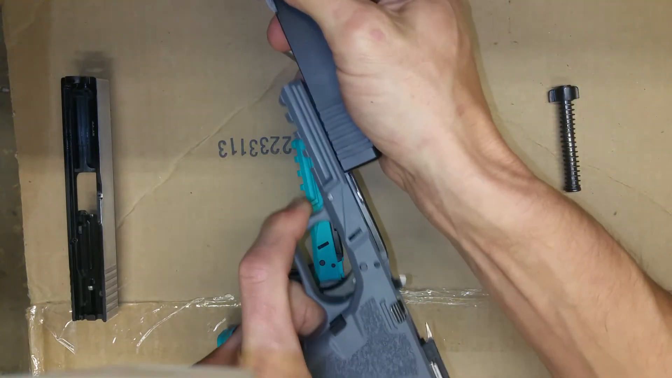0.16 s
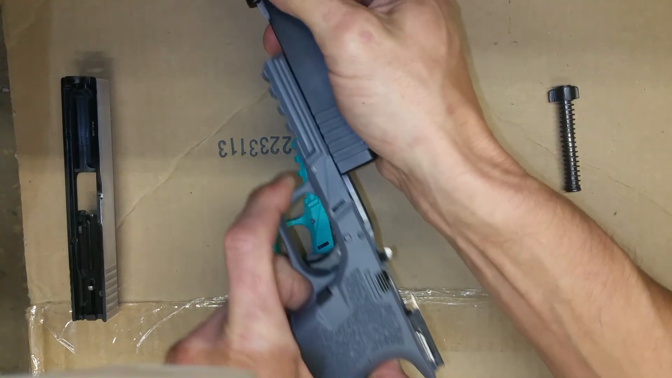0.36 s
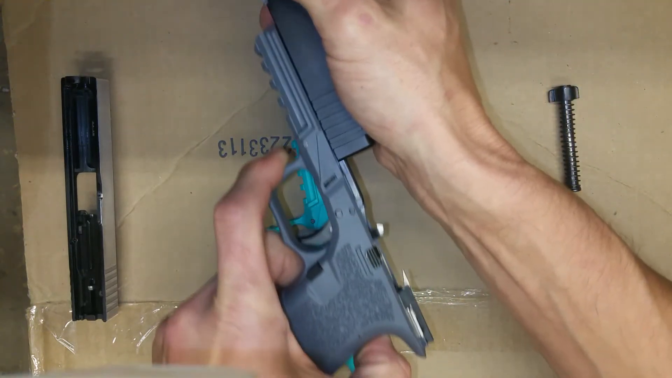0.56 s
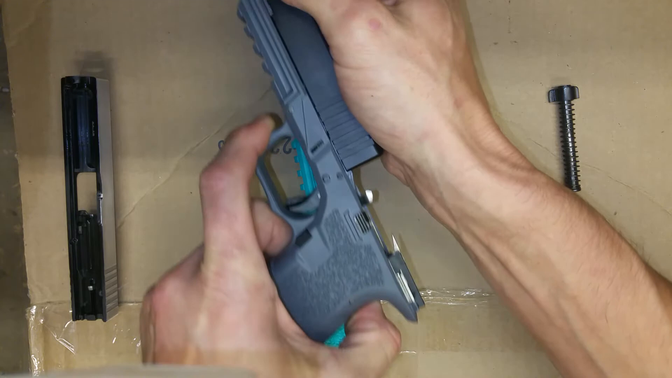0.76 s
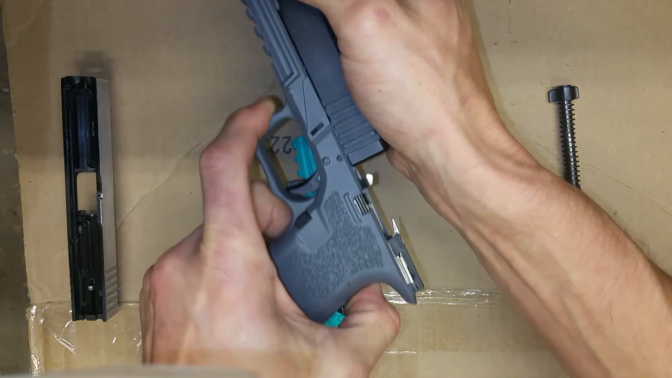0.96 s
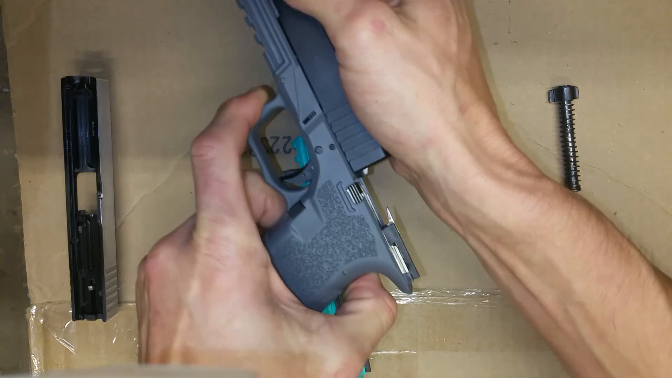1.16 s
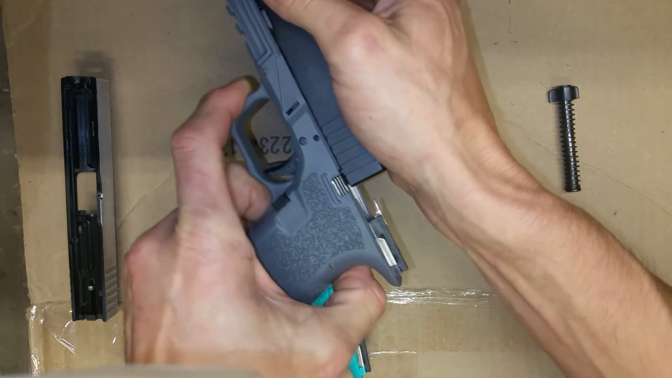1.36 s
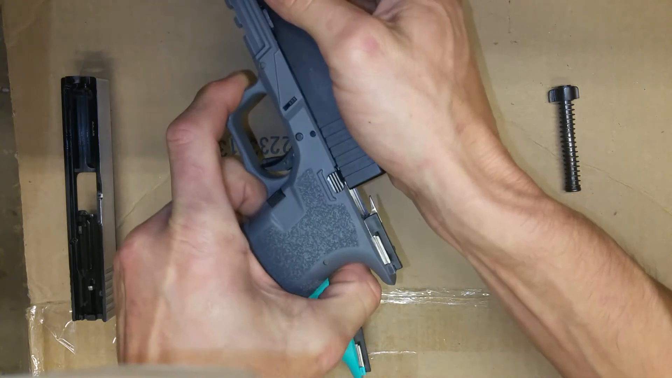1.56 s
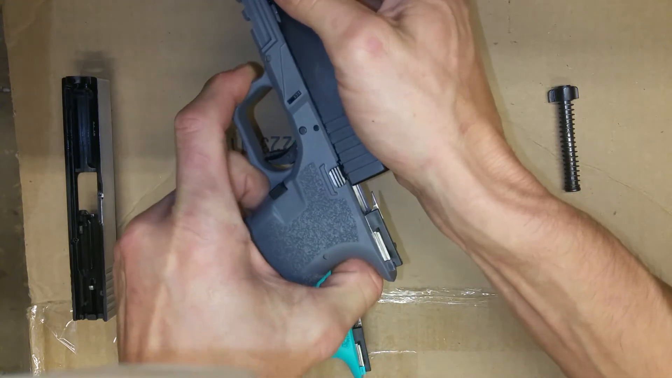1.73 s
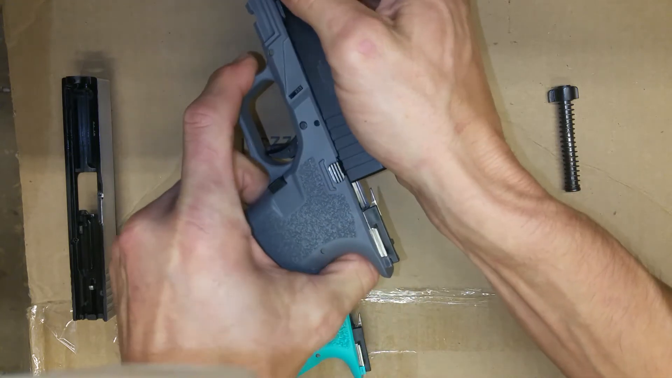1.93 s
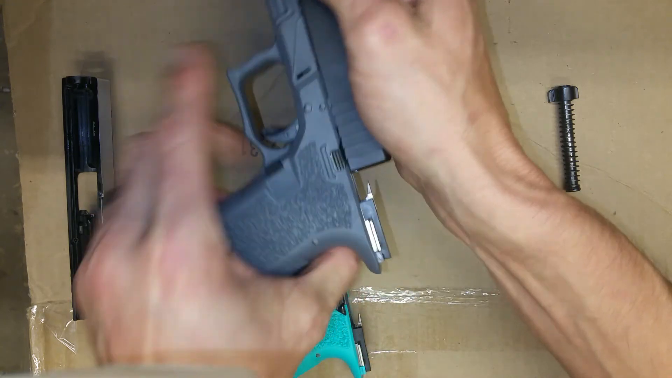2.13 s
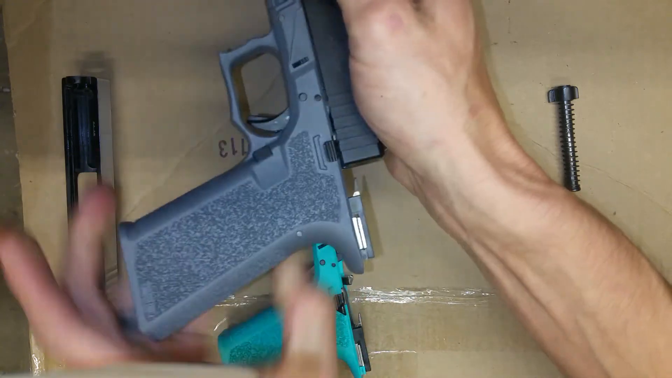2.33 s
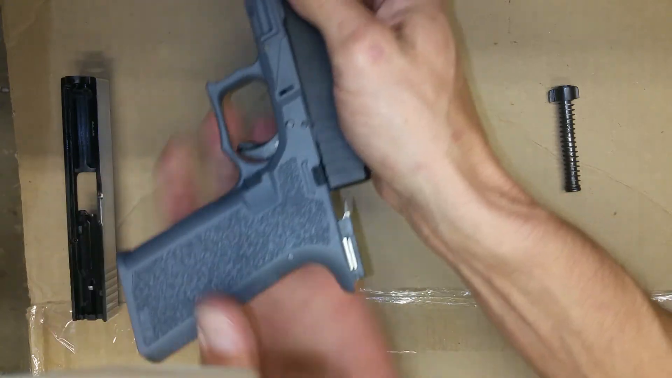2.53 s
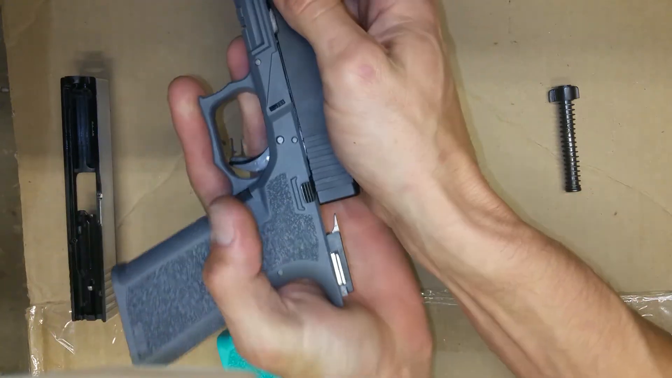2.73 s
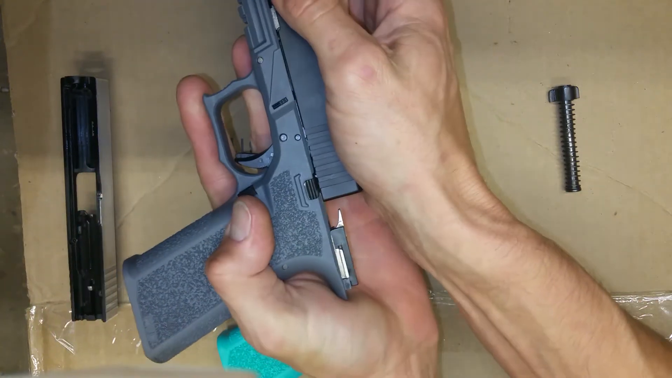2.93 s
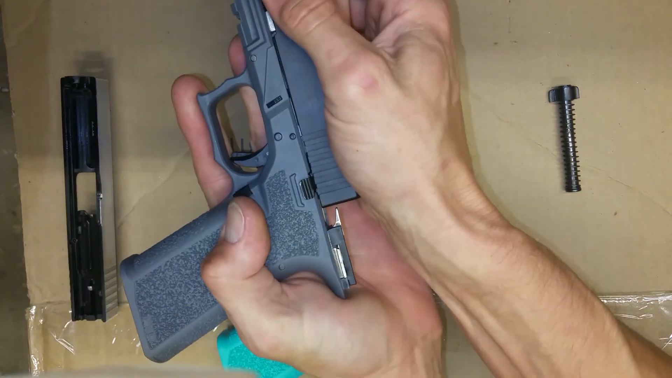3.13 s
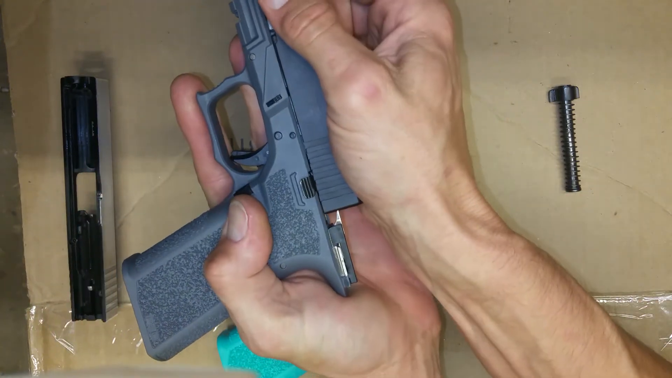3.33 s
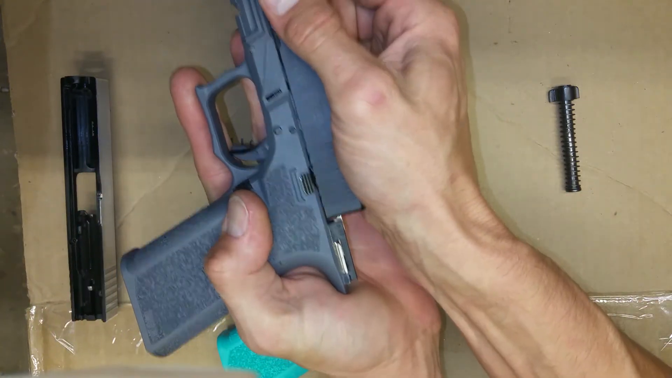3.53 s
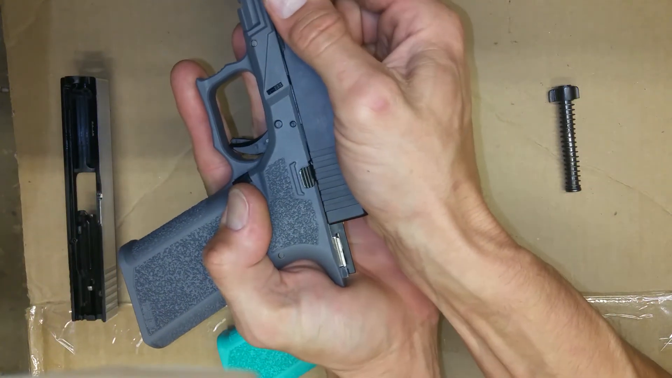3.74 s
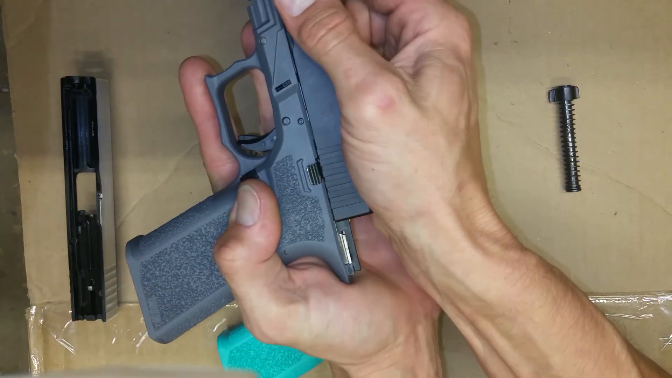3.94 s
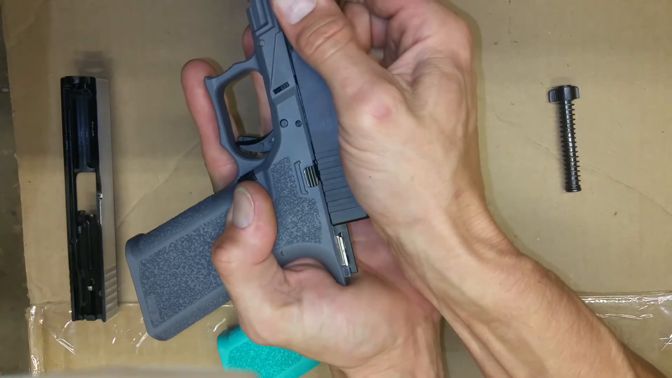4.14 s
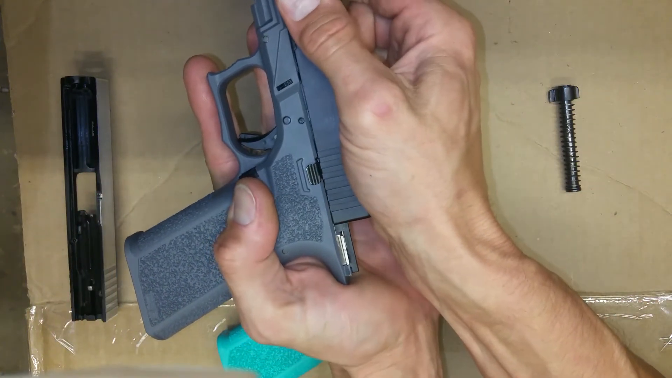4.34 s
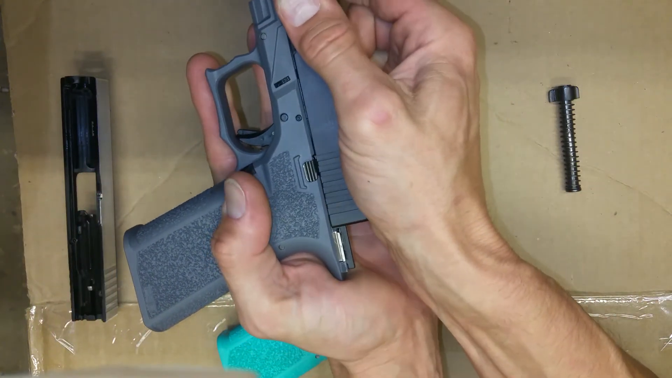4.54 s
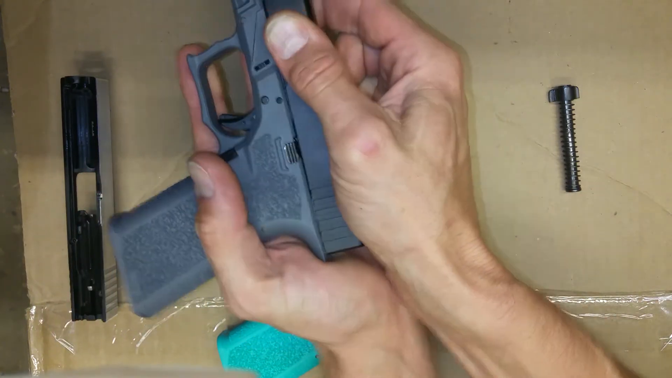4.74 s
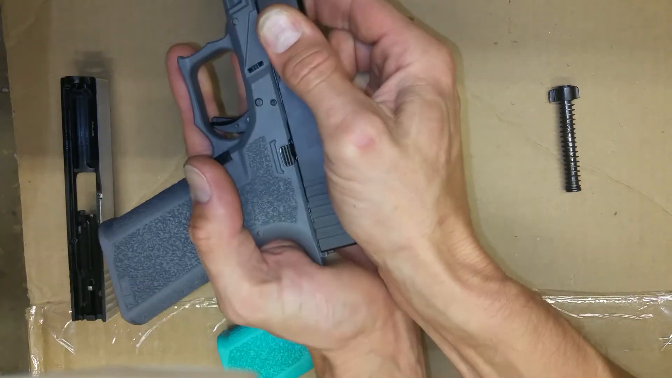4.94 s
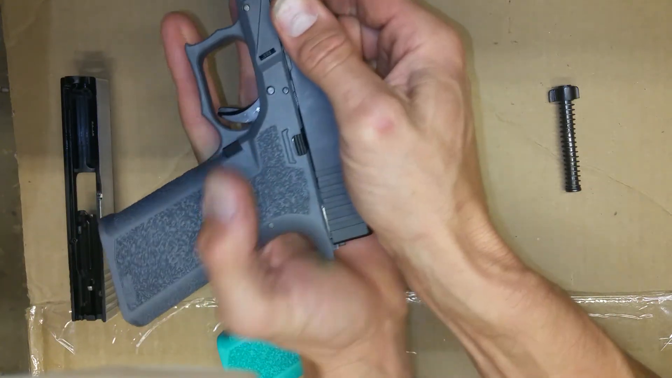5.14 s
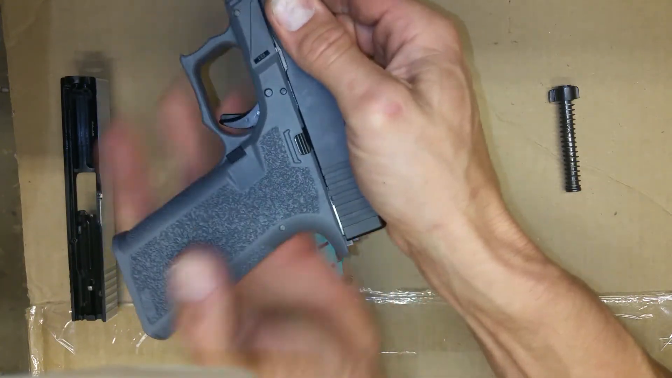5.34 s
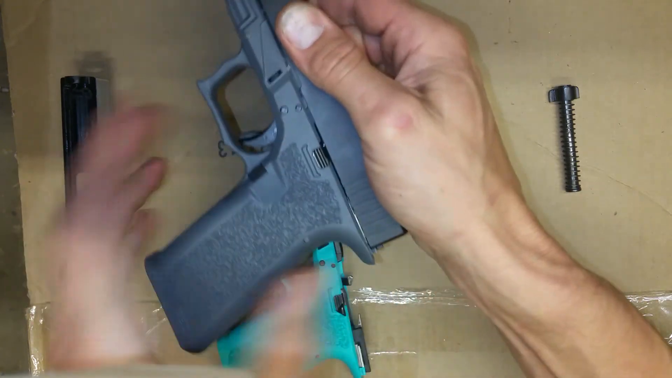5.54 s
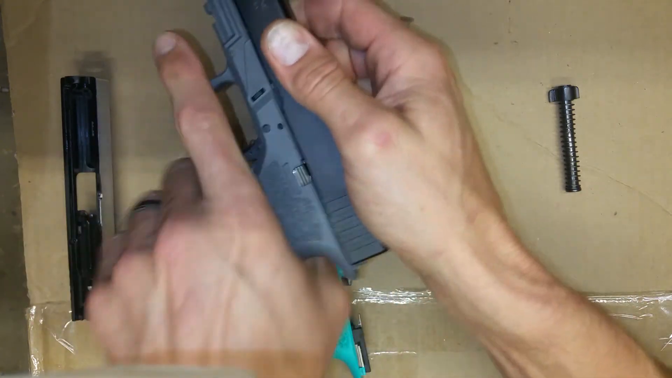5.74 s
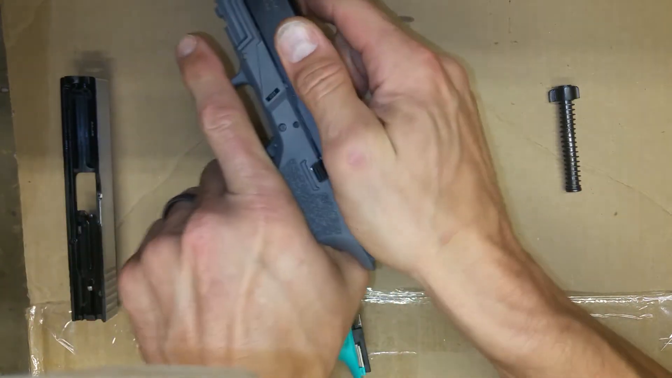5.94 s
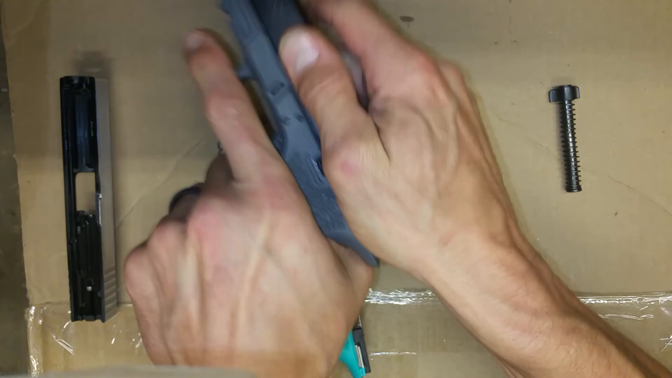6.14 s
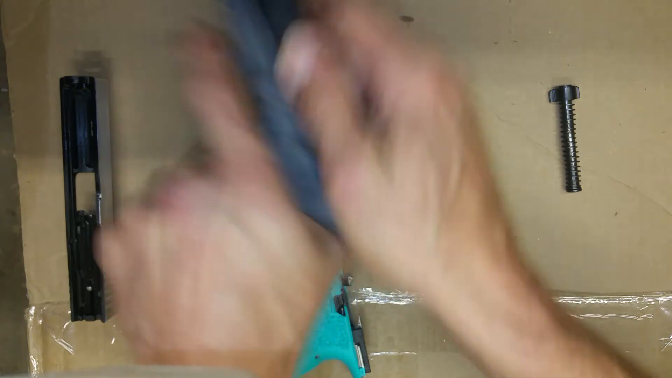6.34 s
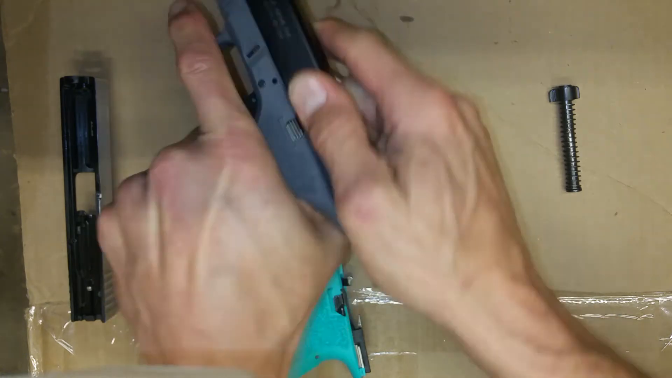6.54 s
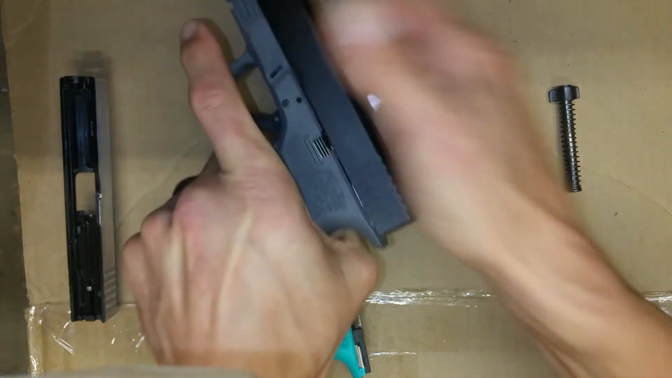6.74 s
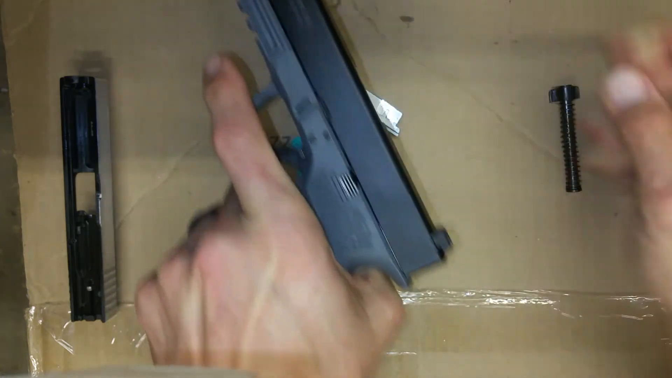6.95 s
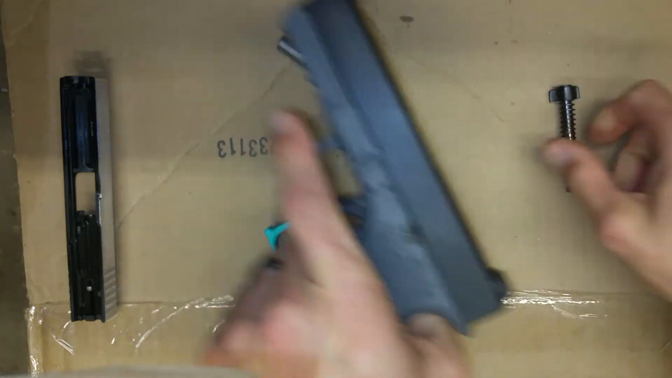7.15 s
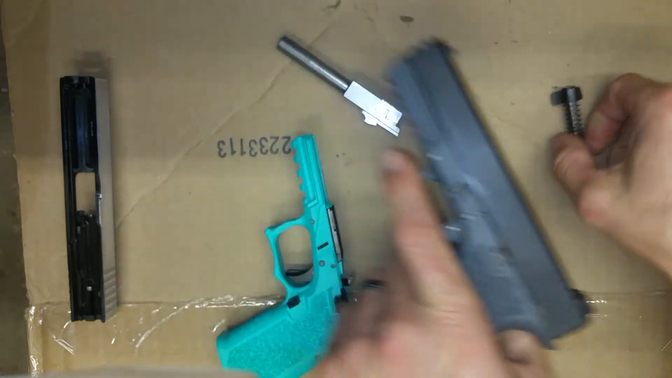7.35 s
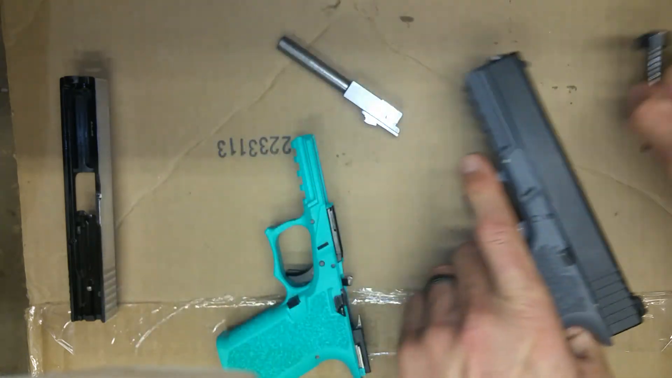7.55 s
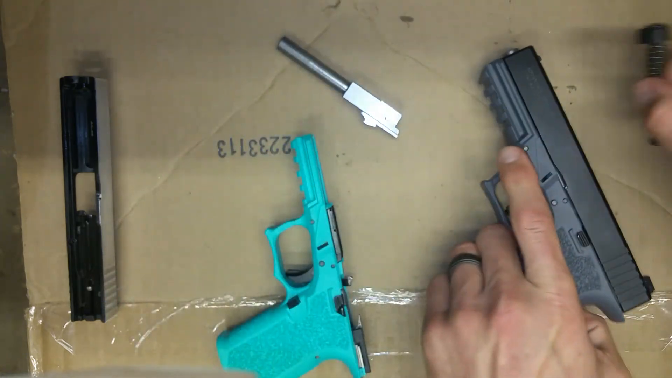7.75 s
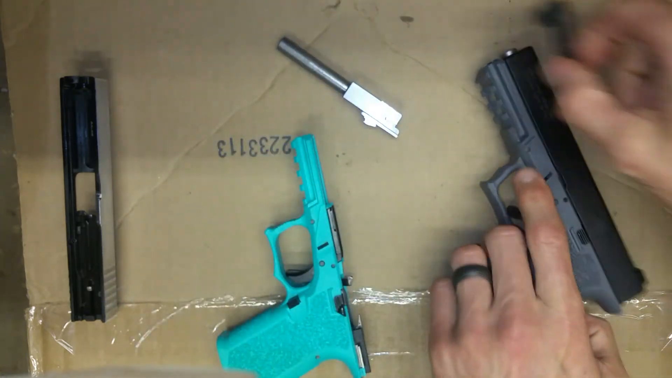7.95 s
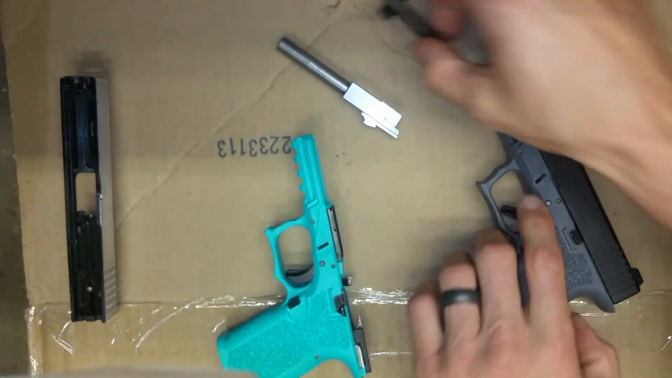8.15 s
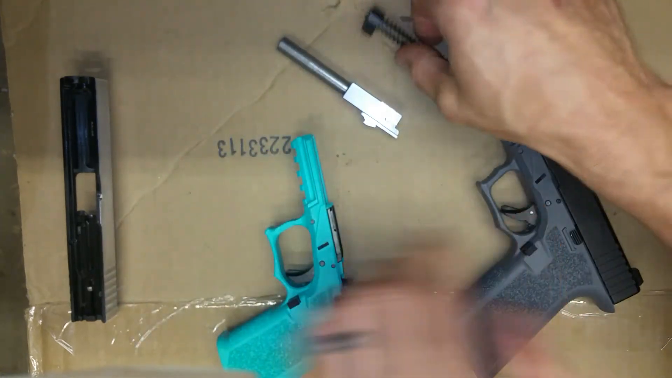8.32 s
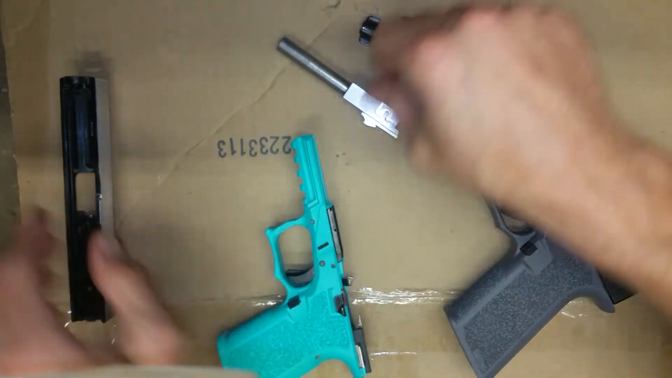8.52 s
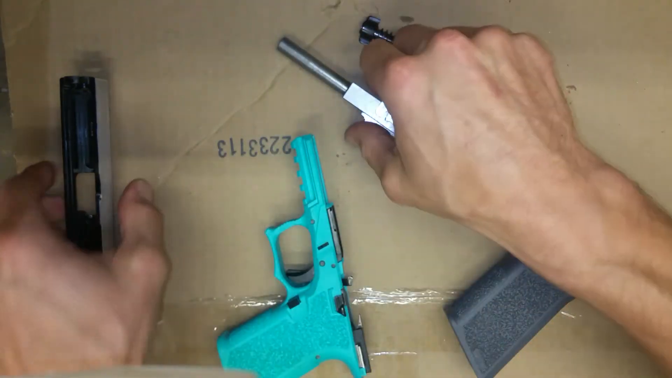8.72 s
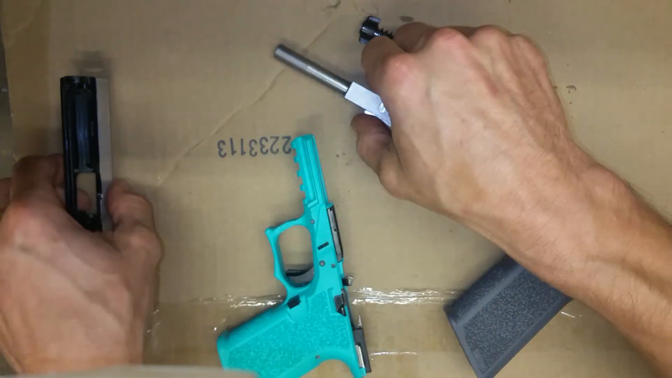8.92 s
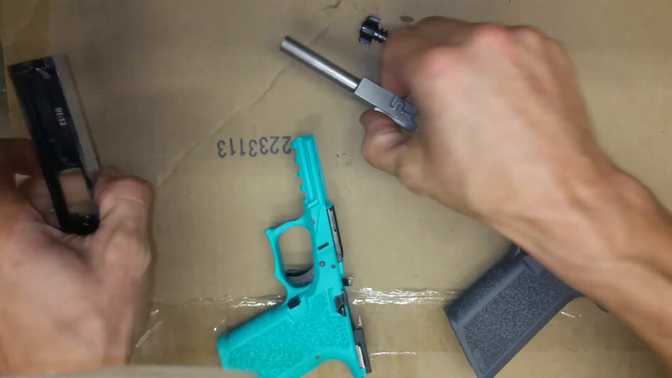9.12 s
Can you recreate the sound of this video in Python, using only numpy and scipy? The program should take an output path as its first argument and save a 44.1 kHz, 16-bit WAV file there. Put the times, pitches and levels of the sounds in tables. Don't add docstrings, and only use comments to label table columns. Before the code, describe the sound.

A small quiet room, close stereo microphone, low rumble and hiss. From 0 to 4.6 seconds hands handle a plastic frame and steel slide: soft skin rubs, with small bright ticks clearest around 0.15-0.2, 0.6, 1.8, 3.06 and 3.54; a very faint distant drone passes near 0.7-1.3. At 4.67 the slide seats with a loud, sharp clack and tight chatter lasting a tenth of a second. Near quiet returns, with tiny ticks, until 6.13-6.65, when racking gives dense steel clacks, gritty rail grinding and short rings around 2.5 kHz. From 7.2 light scuffs and nudges on cardboard; dull damped thumps with rattles at 7.68-7.75, 7.93-8.08 and two hard, boxier knocks at 8.32 and 8.35. Faint nudges and scuffs follow at 8.7-9, as background hiss rises again.

```python
import sys
import numpy as np
from scipy import signal
from scipy.io import wavfile
from scipy.ndimage import uniform_filter1d

SR = 44100
rng = np.random.default_rng(int(sys.argv[2]) if len(sys.argv) > 2 else 0)


def voltage_ratio(decibels):
    exponent = np.asarray(decibels, float) / 20
    return 10 ** exponent


def output_pcm(signal):
    pcm = np.clip(np.atleast_2d(signal).T, -1, 1) * 32767
    wavfile.write(sys.argv[1], SR, np.round(pcm).astype(np.int16))


N = 404838

# frequency in Hz, density in dB per Hz.
AIR_COLOUR = [(12, -29.5), (20, 0), (43, -3.5), (143, -9.5), (251, -19), (351, -16.5), (440, -19.5),
              (583, -25.5), (1390, -32), (3330, -35.5), (5830, -36.5), (7100, -44), (11800, -38),
              (15200, -39), (16500, -57.5)]
# frequency in Hz, left-right correlation.
PORT_LIKENESS = [(60, 0.82), (180, 0.72), (550, 0.028), (1650, 0.65), (4970, -0.065), (15000, -0.04)]
# time in seconds, gain in dB.
BACKGROUND_GAIN = [
    (0, 1),
    (4.65, 0.5),
    (4.75, -3),
    (6.1, -1.5),
    (6.7, -3.5),
    (7.599, -2),
    (8.5, 1.4),
    (9.18, 3.5),
]
# peak time in seconds, level in dB, 20 dB rise and 20 dB fall in seconds.
RUB_STROKES = [(.17, -56, -0.08, 0.08), (.22, -52.5, -0.02, 0.11), (.58, -67, 0.1, 0.74),
               (.63, -60, -0.1, 0.2), (1.025, -62.5, 0.1, 0.05), (1.28, -58, 0.07, 0.02),
               (1.41, -69.5, 1, 0), (1.8, -70, 0.2, -0.18), (2.04, -67, 0.13, 0.03),
               (2.3, -69.5, .45, 0.05), (2.64, -70, .035, 0.22), (3.063, -59.5, 0.06, 0),
               (3.31, -64.5, 0.14, 0.1), (3.542, -53, 0.04, 0.02), (4.04, -71, 0.15, 0.14),
               (4.46, -67.5, 0.1, 0.03), (4.64, -67, 0.04, 0.12), (5.022, -74, 0.2, -0.07),
               (5.16, -74.5, 0, 0.1), (5.664, -67, -0.06, 0.22), (5.78, -75, 0.16, -2),
               (6.115, -74, 0.2, -0.34)]
# peak time in seconds, level in dB, 20 dB rise and fall in seconds.
SCUFF_STROKES = [(7.19, -63, .008, 0.12), (7.37, -59.5, .05, 0.024), (7.33, -72.5, .4, 0.032),
                 (7.67, -71.5, .15, 0.0054), (7.76, -75, .01, 0.17), (7.894, -55.5, .1, 0.048),
                 (7.92, -54.5, .1, 0.012), (8.37, -59.5, .015, 0.092), (8.05, -62, .012, .07),
                 (8.7, -85, .4, .5), (8.706, -73.5, .007, 0.052), (8.942, -66, .17, 0.065),
                 (9.1, -80, .3, 0.52)]
# peak time in seconds, level in dB, 20 dB rise and fall in seconds.
RAIL_STROKES = [(4.7, -41.5, -0.0021, 0.0041), (6.1395, -33.5, -0.04, 0.1658), (6.19, -33, -0.02, 0.1),
                (6.21, -41, -0.0143, 0.06), (6.293, -47, -0.0173, 0.08), (6.344, -33, 0.042, 0.01),
                (6.359, -28.5, -0.008, 0.04), (6.449, -38, -0.0128, 0.1237),
                (6.504, -33.5, -0.0215, 0.0848), (6.639, -34, -0.0157, 0.0483), (6.633, -31.5, 0.04, 0),
                (4.72, -41, 0.02, 0.0173)]
# frequency in Hz, density in dB per Hz.
RUB_COLOUR = [(290, -56.5), (500, -15), (800, -3), (1350, -6), (2300, 4.5), (3400, -6.5), (4300, -6.5),
              (5510, -10), (6960, -16), (15100, -24), (16500, -38.5)]
# low share in dB, top share in dB, dulling in dB per dB of firm pressure.
GRIT = [
    (-4, -3.5, 0.7),
    (-3, 7, -0.5),
    (-6, -3.5, -0.33),
]
# start in seconds, peak in dB, strongest ring in Hz, ring over contact in dB.
TICKS = [(0.144, -44.5, 2880, -10), (0.1588, -32.5, 2590, -6), (0.215, -31.5, 2520, -1),
         (0.5398, -55, 2100, -2), (0.625, -37, 2500, -8), (0.6382, -45, 2660, -1), (1.01, -47.5, 2330, 1),
         (1.045, -45.5, 910, -8), (1.092, -53, 2920, -6), (1.272, -43, 2140, -9), (1.3834, -48, 1990, -4),
         (1.6985, -49.5, 990, -3), (1.801, -39.5, 960, -6.5), (1.909, -51, 1960, 1), (2.02, -53, 2500, 9),
         (2.181, -55.5, 3000, 0), (2.27, -54, 2670, 7.5), (3.0626, -40.5, 2500, -4),
         (3.2224, -52, 2320, -2), (3.525, -52, 2880, 2), (3.541, -37.5, 2350, 7), (3.55, -43, 1510, 3),
         (1.2735, -52, 720, 1), (0.217, -42, 900, 3), (3.064, -45.5, 1520, 10), (4.037, -48.5, 1210, -8),
         (4.4214, -52, 2280, 3), (4.4631, -45, 1060, 0), (4.945, -55, 2340, 1), (5.0194, -58, 2450, 0),
         (5.669, -54, 2664, 4), (5.772, -51, 2280, -9)]
# start in seconds, peak in dB, strongest ring in Hz, top in dB,
# extra low body in dB.
CLACKS = [(4.6658, -3, 2220, -20.5, 1), (4.6798, -16.5, 2300, -26, -4), (4.7035, -25.5, 2900, -23.5, -3.5),
          (4.7123, -15.5, 3150, -27, -6), (4.7193, -17.5, 2330, -28, -4), (4.731, -22, 2513, -28, -4),
          (6.1355, -5.5, 3890, -4.5, -1), (6.1386, -8, 2470, -12.5, -1), (6.1418, -11, 4050, -21, -0.5),
          (6.1493, -18.5, 2497, -7.5, 0), (6.171, -9.5, 3250, -15, 3), (6.2033, -6.5, 2510, -20.5, 10),
          (6.2154, -14.5, 1240, -24.5, -1), (6.2268, -17, 3600, -9.5, -2), (6.2899, -21.5, 2690, -28, 2),
          (6.3265, -22, 760, -21.5, 2.5), (6.338, -9, 2410, -11.5, -3.5), (6.349, -4.5, 2515, -23, -3),
          (6.3557, -16, 4060, -19, -1.5), (6.3636, -15, 1210, -19.5, 3.5), (6.4453, -8, 2760, -23.5, -5.5),
          (6.4627, -8, 2440, -12.5, 1.5), (6.477, -34, 2200, -19, -2.5), (6.4835, -20, 2380, -22.5, -1),
          (6.4976, -2.5, 2280, -21.5, 11), (6.5006, -9, 5420, -21, -2), (6.506, -10.5, 3030, -14, -0.5),
          (6.515, -16.5, 1990, -24, 2.5), (6.572, -27.5, 2600, -31, -2), (6.6214, -10.5, 2270, -17.5, 0),
          (6.6364, -7, 2490, -16.5, 1.5), (6.6383, -20.5, 3920, -20, -3)]
# start in seconds, peak in dB, strongest ring in Hz, top in dB,
# ring over contact in dB.
TOUCHES = [(4.6938, -3, 2560, -29, 15.5), (4.7668, -19.5, 5400, -22.5, -4), (6.6076, -20, 2720, -23, 5),
           (6.6222, -20.5, 3800, -23, 1), (6.6225, -20.5, 4900, -14, 4), (8.3525, -26.5, 3100, -22, 0.5),
           (4.667, -14.5, 3600, -21.5, 6), (6.1124, -41, 2600, -28, -3.5), (7.895, -31.5, 1940, -29, 15),
           (7.897, -40, 1450, -28, 8), (7.88, -47.5, 800, -24, 8.5), (8.0415, -29, 4600, -19, -20),
           (7.9315, -32.5, 8500, -1, -11), (6.3345, -19.5, 2300, -11, -2.5), (8.912, -54, 5000, -5, -14.5),
           (8.932, -52, 4000, -2, -14), (8.97, -52, 10000, 5, -3)]
# frequency in Hz, density in dB per Hz.
STEEL_COLOUR = [(88, -72.5), (150, -27.5), (479, -11), (594, -6), (798, -3.5), (1150, -10.5), (1700, -14),
                (2450, -9.5), (5480, -19.5), (6680, -16), (12800, -17), (15300, -25.5), (16500, -58.5)]
# frequency in Hz, level in dB, T60 in seconds.
SLIDE_MODES = [(1800, -18, .07), (2260, -7, .08), (2440, -2, .11), (2540, 0, .1), (2830, -7, .07),
               (3180, -8, .07), (3350, -9, .07), (3900, -8, .06), (5800, -15, .06), (12400, -20, .08)]
# start in seconds, frequency in Hz, level in dB, T60 in seconds.
LONG_RINGS = [(6.637, 790, -69, .8), (6.637, 3000, -56, .55), (6.639, 4000, -38, .09),
              (6.65, 5750, -44, .08), (4.666, 5800, -32, .07), (7.896, 1450, -43, .1),
              (7.87, 950, -55, .15), (4.7, 2530, -44, .2), (7.205, 545, -46, .13), (4.694, 2455, -35, .33),
              (6.349, 2540, -25, .13), (6.638, 2500, -28, .12), (6.204, 2540, -31, .12),
              (6.215, 12400, -39, .1), (8.95, 4250, -83, 1.5), (.216, 780, -53, .16), (.216, 4350, -57, .1),
              (.159, 4350, -56, .1)]
# time in seconds, level in dB.
FAR_HUM_LEVEL = [
    (0.3, -97),
    (.7, -72.5),
    (1.3, -75),
    (1.9, -95),
]
# start in seconds, peak in dB, panel mode in Hz, upper modes in dB,
# time until gripped in seconds.
NUDGES = [(7.190, -29, 216.5, -9, .045), (7.276, -39, 189, -20, 0.014), (7.29, -35, 231, -22, .01),
          (7.345, -46, 230, 3, .012), (7.352, -38.5, 237, -3, .012), (7.306, -36.5, 195, -19, .008),
          (7.9, -32, 202, -25, .035), (8.7061, -41, 222, -2.5, 0.021), (8.772, -45.5, 218, -28.5, 0.033),
          (8.873, -29.5, 208.6, -8.5, 0.029), (8.917, -41.5, 182, -10.5, 0.022),
          (8.938, -28.5, 173, -8.5, 0.029), (8.979, -42, 152.7, -39.5, .03), (6.203, -47.5, 100, -20, .03),
          (6.349, -54, 110, -20, .03), (6.497, -53, 130.5, -7, 0.033)]
# start in seconds, peak in dB, panel mode in Hz, upper modes in dB,
# contact snap in dB.
KNOCKS = [(7.678, -9, 219.7, -10.5, -33.5), (7.688, -11.5, 200, -9.5, -33.5), (7.699, -15, 207, -11, -37.5),
          (7.725, -16, 193, -28.5, -51), (7.742, -24, 200, -26, -50), (7.749, -14, 225, -25, -51),
          (7.932, -8.5, 113, -8.5, -36.5), (7.962, -20, 210, -20, -36), (7.979, -16, 92, -12, -37),
          (8.007, -21, 215, -25.5, -40), (8.041, -10.5, 198, -15.5, -35), (8.051, -12.5, 204, -23, -40.5),
          (8.063, -21, 207, -24, -50), (8.079, -19.5, 207, -16, -50.5), (8.316, -3, 178, 14.5, -35),
          (8.3241, -10.5, 206, -14, -39), (8.3522, -2, 224.3, 12, -29), (8.357, -9.5, 225, -9.5, -41),
          (8.374, -22, 200, -6, -30.5), (8.391, -18, 218, -9, -37.5), (8.413, -23.5, 163, -11, -48),
          (8.426, -21, 191, -8.5, -52), (8.439, -21.5, 216, -0.5, -49), (8.458, -36.5, 197, -12, -45)]
# frequency in Hz, level in dB, T60 in seconds.
CARDBOARD_MODES = [(100.8, -17.5, 0.13), (127, -15.5, 0.16), (150, -9, 0.13), (205.6, -9.5, 0.15),
                   (248.7, 16, 0.053), (310, 0, 0.017), (365, -3, 0.06), (430, -0.5, 0.16),
                   (547, -3, 0.065), (542, 8.5, 0.043), (599.3, 6.5, 0.083), (676, 2.5, 0.05),
                   (780, -6.5, 0.026), (920, -6, 0.06)]
# frequency in Hz, density in dB per Hz.
SNAP_COLOUR = [(410, -36), (700, -3), (1340, -14), (1470, -11), (2700, -25), (3040, -29.5), (7170, -43.5),
               (14500, -53.5), (16500, -68.5)]
# peak time in seconds, level in dB, 20 dB rise and fall in seconds.
RATTLE_STROKES = [(7.193, -56, -0.02, -0.02), (7.295, -51, -0.04, -0.03), (7.36, -49, .035, .045),
                  (7.682, -32, -0.005, 0.1), (7.752, -38.5, 0, 0.08), (7.9, -45.5, .06, 0.17),
                  (7.935, -36, 0.0041, 0.0851), (7.982, -37.5, .004, 0.0669), (8.042, -37, 0.0272, .08),
                  (8.32, -39, 0.0167, -0.03), (8.356, -32.5, 0.0129, 0.106), (8.44, -45.5, 0.12, 0.08),
                  (8.709, -64, -0.1, 0.65), (8.876, -56.5, 0.08, 0.2), (8.942, -58, 0.05, 0.1)]
# frequency in Hz, density in dB per Hz.
RATTLE_COLOUR = [(150, -30.5), (320, -9.5), (570, 2.5), (950, -9.5), (1450, -14), (2200, -21.5),
                 (4000, -33.5), (9000, -50)]
# frequency in Hz, T60 in seconds.
ROOM_T60 = [(100, .3), (500, 0.19), (2500, 0.2), (6000, 0.2), (14000, 0.067)]
# frequency in Hz, gain in dB.
LEFT_SHADE = [(100, -3), (500, -5), (2500, -11), (6000, -12), (14000, -18)]

AIR_DB = -64.5
FIRM_DB, IDLE_DB = -63.5, -96.5
TICK_TOP_DB, TICK_DULLING = -30, 1.2
CLACK_NOTE_DB = -5
BODY_DB, BODY_SLOPE, BODY_MAX_DB = -31.5, -.4, -16
BLOB_S = .0015
FUZZ_S = .002
NOTE_TO_ROOM = .3
PRESSED_T60_S, FREE_T60_S, FREE_DB = 0.05, 0.084, -21
NUDGE_SNAP_DB, NUDGE_T60_S = -32, .17
GRIP_T60_S, LAST_HOLD_S = .045, .04
PAIR = .8
LEFT_LAG_SAMPLES = 10
EDGE_HZ = 16500


def evened(x):
    return x / np.sqrt(np.mean(x ** 2) + 1e-20)


def peak_one(x):
    return x / abs(x).max()


def read(points, hz):
    f, value = np.transpose(points)
    return np.interp(np.log(hz + 1), np.log(f + 1), value)


def add(mix, s, sound):
    part = mix[round(s * SR):][:len(sound)]
    part += sound[:len(part)]


def colour(x, gain_db):
    hz = abs(np.fft.fftfreq(4096, 1 / SR))
    log_gain = np.log(voltage_ratio(np.maximum(gain_db(hz), -100)))
    taps = np.fft.ifft(np.exp(np.conj(signal.hilbert(log_gain)))).real[:2048]
    return signal.fftconvolve(x, taps)[:len(x)]


def ring(t, hz, t60, phase=0):
    return voltage_ratio(-60 * t / t60) * np.sin(2 * np.pi * (hz * t + phase))


def strokes(rows):
    s, db, rise, fall = np.transpose(rows)[:, :, None]
    t = np.arange(0, N / SR, 1 / 1000) - s
    swell = np.minimum(t / np.maximum(rise, 1 / 1000), -t / np.maximum(fall, 1 / 1000))
    return (db + 20 * swell).max(0)


def per_sample(level):
    return np.interp(np.arange(N) / SR * 1000, np.arange(len(level)), level)


def air():
    frames, hz = N // 256 + 5, np.fft.rfftfreq(1024, 1 / SR)
    a, b, c, d, patches = rng.standard_normal((frames, 513, 5)).T
    patches = evened(uniform_filter1d(uniform_filter1d(patches, 10, 0), 14, 1))
    same = np.clip(read(PORT_LIKENESS, hz), -1, 1)[:, None]
    left = a + 1j * b
    z = np.array([left, same * left + np.sqrt(1 - same ** 2) * (c + 1j * d)])
    z *= voltage_ratio(read(AIR_COLOUR, hz)[:, None] + 1.6 * patches)
    hiss = evened(signal.istft(z, nperseg=1024, noverlap=768)[1][:, :N])
    gain_db = np.interp(np.arange(N) / SR, *np.transpose(BACKGROUND_GAIN))
    return voltage_ratio(AIR_DB + 1.0 + gain_db) * hiss


def rub():
    strength = voltage_ratio(2.2 * np.minimum(rng.exponential(1, N), 5))
    slips = strength * (rng.random(N) < 3500 / SR) * rng.standard_normal(N)
    low_points = [(120, -29.5), (300, -1.5), (500, 0.5), (1000, -2.0), (1800, -29)]
    top_points = [(4000, -39.5), (7500, 2.0), (15500, -3), (16500, -31.5)]
    main = evened(colour(slips, lambda f: read(RUB_COLOUR, f)))
    low = evened(colour(slips, lambda f: read(low_points, f)))
    top = evened(colour(slips, lambda f: read(top_points, f)))
    out = np.zeros(N)
    for rows, (low_db, top_db, dulling) in zip((RUB_STROKES, SCUFF_STROKES, RAIL_STROKES), GRIT):
        level_db = strokes(rows)
        edges_db = level_db - dulling * np.maximum(level_db - FIRM_DB, 0)
        grit = voltage_ratio(low_db - 21) * low + voltage_ratio(top_db - 18) * top
        out += per_sample(voltage_ratio(level_db - 3.0)) * main + per_sample(voltage_ratio(edges_db - 3.0)) * grit
    return out + voltage_ratio(IDLE_DB) * main


def body_db(db):
    return min(BODY_DB + BODY_SLOPE * db, BODY_MAX_DB)


def clack(s, db, hz, low_db, top_db, note_db):
    t = np.arange(6000) / SR
    chatter = rng.standard_normal(len(t)) * voltage_ratio(2.0 * rng.exponential(1, len(t) // 30).repeat(30))
    drive = rng.standard_normal(len(t)) * (1 - np.exp(-t / 0.00067)) * voltage_ratio(-60 * t / 0.0099)
    drive += 0.15 * chatter * voltage_ratio(-60 * t / 0.075)
    drive[8] += 3.5
    tilt = [(900, low_db + 11.0), (1500, 0.00022), (3200, 0.00028), (6000, 0.2 * (top_db + 19.5)),
            (7500, top_db + 9.5), (13000, top_db + 12.0), (15500, top_db + 16.5)]
    body = peak_one(colour(drive, lambda f: read(STEEL_COLOUR, f) + read(tilt, f)))

    swell = np.minimum(t / BLOB_S, 1) * np.exp(-(t / BLOB_S - 1.2) ** 2 / 2)
    blob = swell * (ring(t, hz, .1) + 0.78 * ring(t, 1.3 * hz, 0.0087, rng.random()))
    note = peak_one(blob + .07 * peak_one(signal.fftconvolve(drive, blob[:1000])[:len(t)]))

    slide = sum(voltage_ratio(d + 3.9 * rng.standard_normal()) * ring(t, f * rng.uniform(1.0, 1.005), t60)
                for f, d, t60 in SLIDE_MODES)
    slide = peak_one(slide) * np.cos(np.pi / 2 * t / t[-1])
    share = voltage_ratio(db) / (1 + voltage_ratio(note_db))
    return s, share * body + voltage_ratio(db) * 0.12 * slide, share * voltage_ratio(note_db) * note


def steel_contacts():
    ticks = [clack(s, db, hz, body_db(db), TICK_TOP_DB - TICK_DULLING * (db + 47.5), note_db)
             for s, db, hz, note_db in TICKS]
    clacks = [clack(s, db, hz, body_db(db) + more_db, top_db, CLACK_NOTE_DB)
              for s, db, hz, top_db, more_db in CLACKS]
    touches = [clack(s, db, hz, body_db(db), top_db, note_db) for s, db, hz, top_db, note_db in TOUCHES]
    return ticks + clacks + touches


def long_ring(hz, db, t60):
    waver = evened(uniform_filter1d(rng.standard_normal(SR), round(FUZZ_S * SR)))
    strength = .6 + .8 * waver if t60 < .25 and hz > 2000 else 1
    return voltage_ratio(db) * ring(np.arange(SR) / SR, hz, t60) * strength


def far_hum():
    band = [(200, -40), (290, -3), (340, -0.5), (420, -7.5), (700, -14), (1000, -45)]
    drone = colour(rng.standard_normal(N), lambda f: read(band, f))
    return voltage_ratio(np.interp(np.arange(N) / SR, *np.transpose(FAR_HUM_LEVEL))) * evened(drone)


def knock(s, db, hz, upper_db, snap_db, t60, hold):
    t = np.arange(10000) / SR
    t60 = max(t60, .02)
    push = rng.standard_normal(len(t)) * 0.04 * voltage_ratio(-60 * t / 0.11)
    push[0] = -1
    push = signal.fftconvolve(push, np.hanning(24))[:len(t)]
    modes = [voltage_ratio(d + 2.3 * rng.standard_normal()) * ring(t, f * rng.uniform(0.97, 1.03), w * t60 * 10)
             for f, d, w in CARDBOARD_MODES]
    low = peak_one(ring(t, hz, t60) + 0.15 * ring(t, PAIR * hz, t60) + 0.35 * peak_one(sum(modes[:6])))
    panel = low + voltage_ratio(upper_db + 4.5) * peak_one(sum(modes[6:]))
    panel = signal.sosfilt(signal.butter(2, hz / 2, "high", fs=SR, output="sos"), panel)
    crumple = rng.standard_normal(len(t)) * (voltage_ratio(-60 * t / 0.036) + 0.5 * voltage_ratio(-60 * t / 0.14))
    snap = peak_one(colour(crumple, lambda f: read(SNAP_COLOUR, f)))
    grip = voltage_ratio(-60 * np.maximum(t - hold, 0) / GRIP_T60_S)
    thump = grip * peak_one(signal.fftconvolve(push, panel)[:len(t)])
    return s, voltage_ratio(db) * (thump + voltage_ratio(snap_db + 18.5) * snap)


def cardboard():
    bench = np.zeros(N)
    for s, db, hz, upper_db, hold in NUDGES:
        add(bench, *knock(s, db, hz, upper_db, NUDGE_SNAP_DB, NUDGE_T60_S, hold))
    holds = np.diff([row[0] for row in KNOCKS], append=N / SR)
    for row, hold in zip(KNOCKS, holds):
        t60 = PRESSED_T60_S + (FREE_T60_S - PRESSED_T60_S) * min(row[1] / FREE_DB, 1)
        add(bench, *knock(*row, t60, min(hold, LAST_HOLD_S)))
    return bench


def rattle():
    strength = voltage_ratio(2.7 * np.minimum(rng.exponential(1, N), 4))
    taps = strength * (rng.random(N) < 900 / SR) * rng.standard_normal(N)
    t = np.arange(3000) / SR
    modes = sum(ring(t, f, t60 / 2, rng.random()) for f, _, t60 in CARDBOARD_MODES[5:])
    shake = evened(colour(taps, lambda f: read(RATTLE_COLOUR, f)))
    shake += 0.79 * evened(signal.oaconvolve(taps, modes)[:N])
    return per_sample(voltage_ratio(strokes(RATTLE_STROKES))) * evened(shake)


def ports(x, lag=LEFT_LAG_SAMPLES):
    return np.array([colour(np.roll(x, lag), lambda f: read(LEFT_SHADE, f)), x])


def room(x):
    taps = np.zeros((2, SR // 2))
    at = np.arange(60, SR // 2 - 20, 20) + rng.integers(0, 20, (2, (SR // 2 - 61) // 20))
    np.put_along_axis(taps, at, rng.choice([-1., 1.], at.shape), 1)
    hz, t, z = signal.stft(taps, SR, nperseg=256)
    same = np.clip(read(PORT_LIKENESS, hz), 0, 1)[:, None]
    z[0] = same * z[1] + np.sqrt(1 - same ** 2) * z[0]
    decay = voltage_ratio(-60 * t / read(ROOM_T60, hz)[:, None]) + 0.8 * voltage_ratio(-60 * t / 0.013)
    tail = signal.istft(z * decay, SR, nperseg=256)[1]
    return signal.fftconvolve(x[None], tail / np.linalg.norm(tail[0]), axes=1)[:, :N]


def scene():
    near_end, far_end, to_room = np.zeros((3, N))
    hands = rub()
    for k, (s, body, note) in enumerate(steel_contacts()):
        add((near_end, far_end)[k % 2], s, body + note)
        add(to_room, s, body + NOTE_TO_ROOM * note)
    for s, hz, db, t60 in LONG_RINGS:
        add(near_end, s, long_ring(hz, db, t60))
    bench = cardboard() + rattle()
    direct = ports(voltage_ratio(5.0) * near_end + voltage_ratio(1.0) * bench + voltage_ratio(6.0) * hands)
    direct += ports(voltage_ratio(6.0) * far_end, lag=LEFT_LAG_SAMPLES + 2)
    near = direct + room(voltage_ratio(-2.5) * to_room + voltage_ratio(-13) * bench + voltage_ratio(-5.5) * hands)
    near = signal.sosfilt(signal.butter(4, 75, "high", fs=SR, output="sos"), near)
    return near + air() + far_hum()


def roll_off(x):
    return signal.sosfilt(signal.butter(12, 16930, fs=SR, output="sos"), x)


def record(dry):
    over = np.maximum(abs(dry) - .6, 0)
    limited = dry - np.sign(dry) * (over - .3 * np.tanh(over / .3))
    low_pass = signal.firwin(255, EDGE_HZ, window=("kaiser", 9), fs=SR)
    mix = signal.oaconvolve(limited, low_pass[None], "same")
    return roll_off(mix)


dry = scene()
out = record(dry)
output_pcm(out)
```